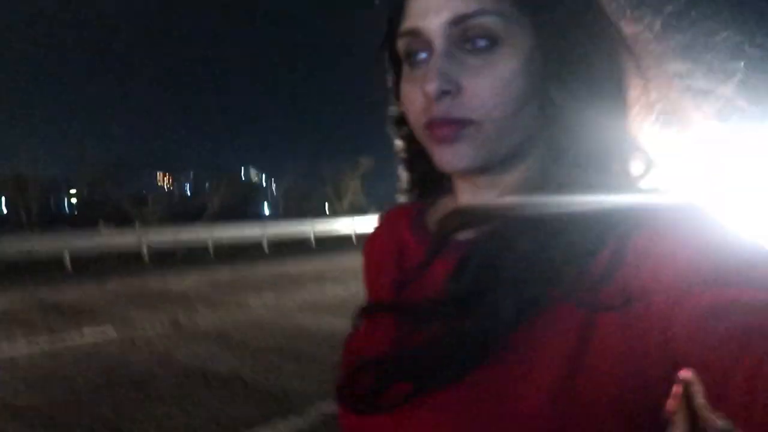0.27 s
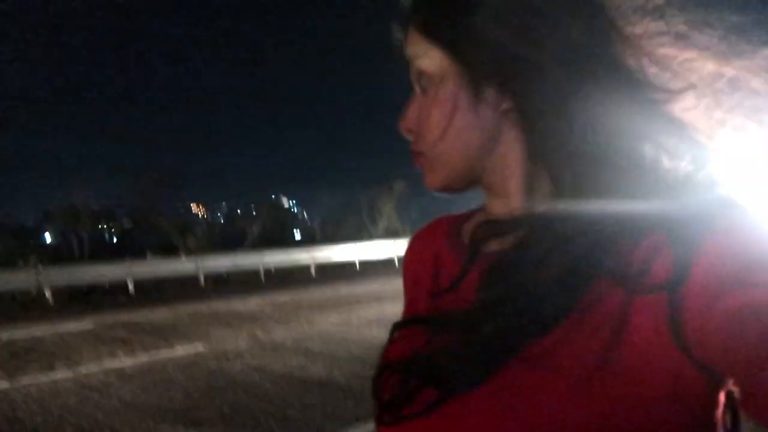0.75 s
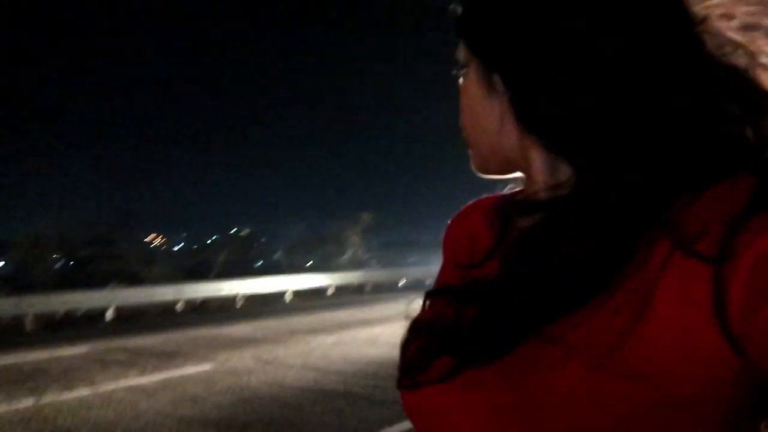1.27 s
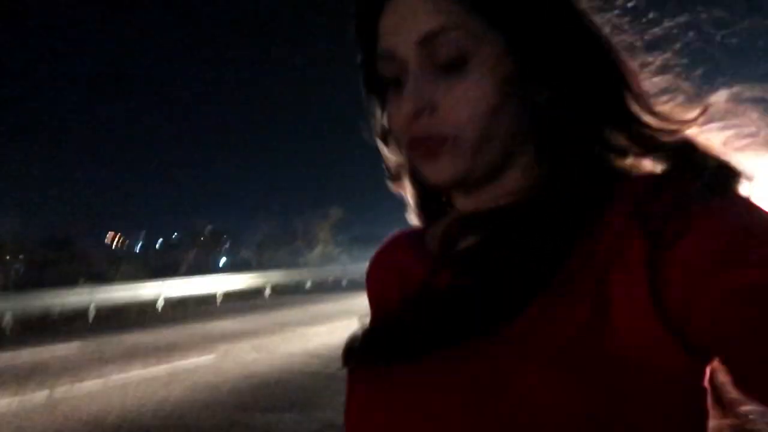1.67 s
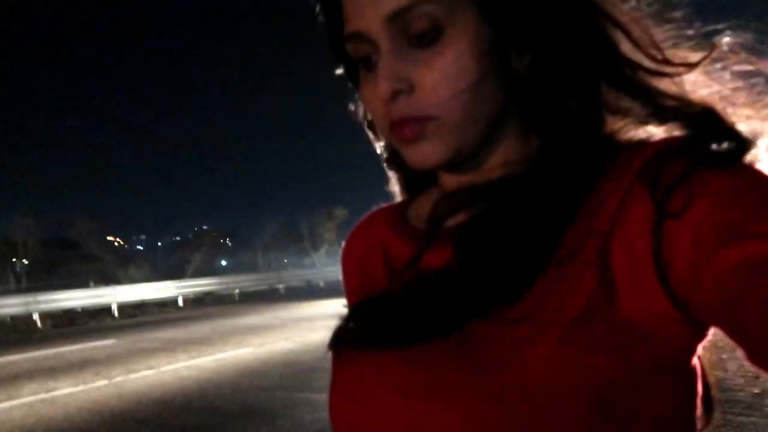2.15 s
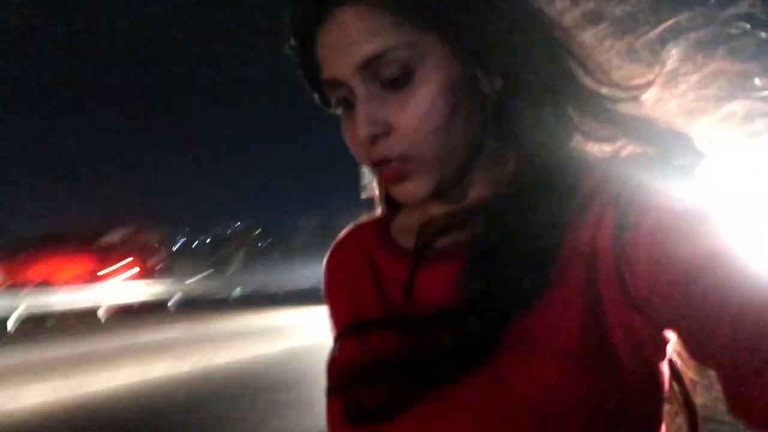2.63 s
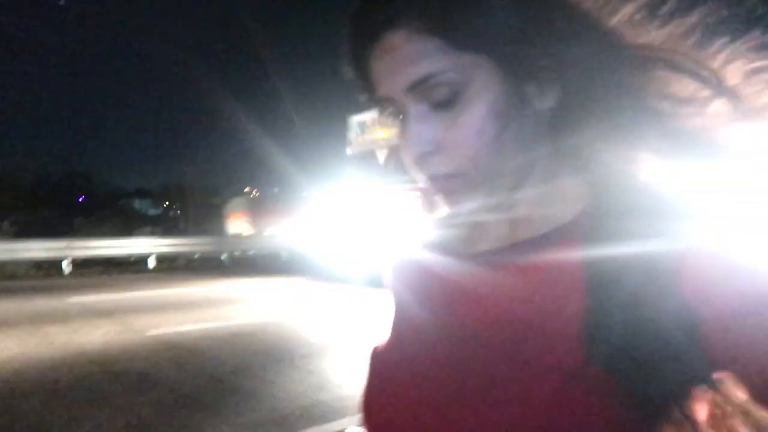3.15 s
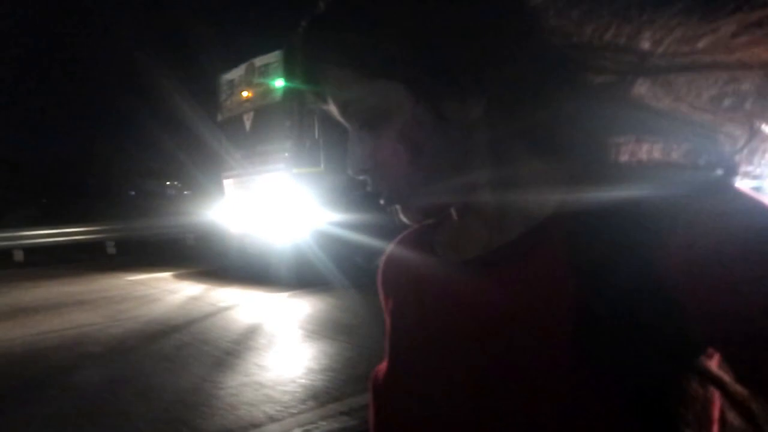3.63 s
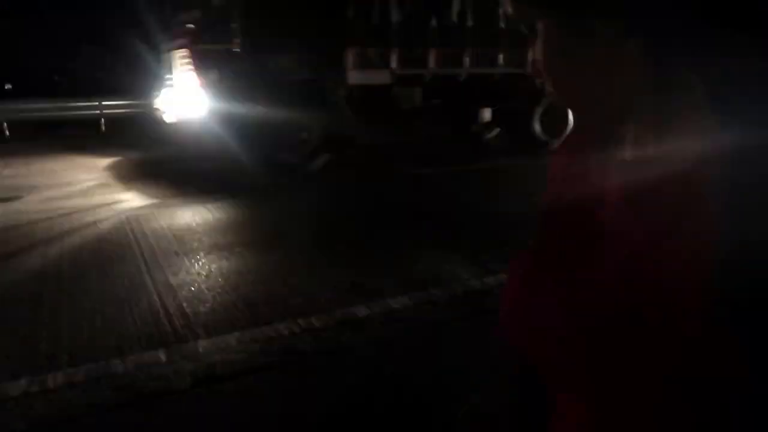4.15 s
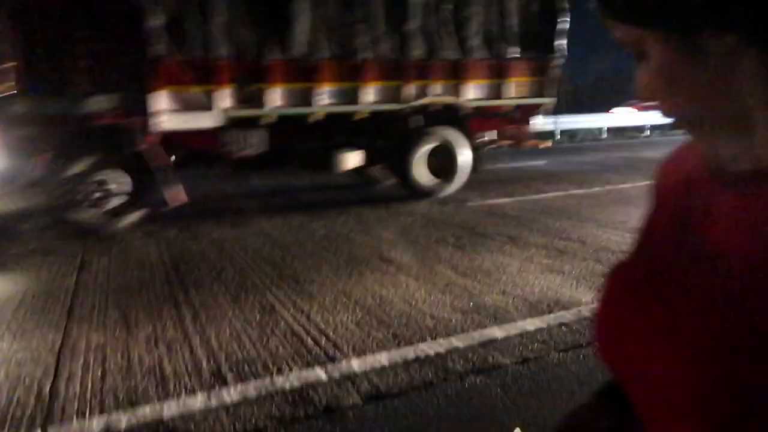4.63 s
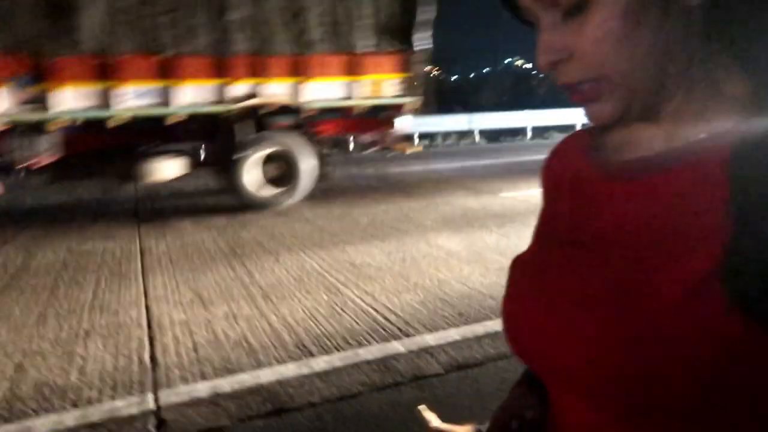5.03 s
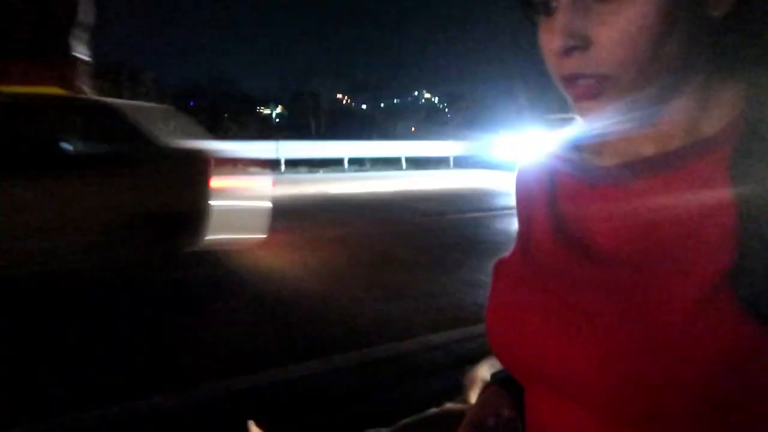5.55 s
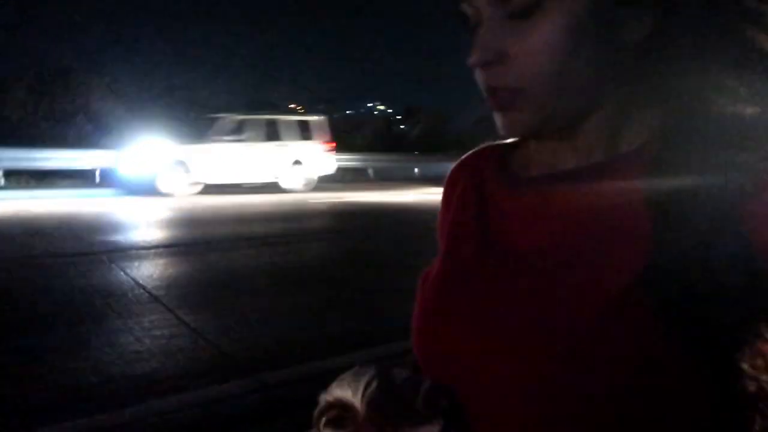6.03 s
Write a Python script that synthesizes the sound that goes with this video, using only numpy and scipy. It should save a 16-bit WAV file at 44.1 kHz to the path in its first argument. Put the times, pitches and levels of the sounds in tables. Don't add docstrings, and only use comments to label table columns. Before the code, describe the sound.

Hard wind buffets a hand-held microphone beside a highway as vehicles rush past, tyres whining on grooved concrete, louder and closer towards the end.

```python
import sys
import numpy as np
from scipy import signal
from scipy.fft import rfft, irfft, next_fast_len
from scipy.io import wavfile
from scipy.ndimage import uniform_filter1d, minimum_filter1d, map_coordinates

SR = 44100
rng = np.random.default_rng(int(sys.argv[2]) if len(sys.argv) > 2 else 0)


def volts_from_db(level):
    exponent = np.asarray(level, float) / 20
    return 10 ** exponent


def wav_out(sig):
    wavfile.write(sys.argv[1], SR, np.round(np.clip(np.atleast_2d(sig).T, -1, 1) * 32767).astype(np.int16))


N = 277168
STEP = 64


def unit(x):
    return x / np.sqrt(np.mean(x ** 2) + 1e-20)


def power_db(power):
    return 10 * np.log10(np.abs(power) + 1e-12)


def curves(rows):
    s, *cols = np.transpose(rows)
    return [np.interp(np.arange(N) / SR, s, c) for c in cols]


def per_sample(x):
    return np.interp(np.arange(N), np.arange(0, N, STEP), x)


def wobble(rate):
    return map_coordinates(rng.standard_normal(int(N * rate / SR) + 4), [np.arange(N) * rate / SR])


def colour(x, points, turn=0):
    m = next_fast_len(N + 8192)
    hz, db = np.transpose(points)
    log_hz = np.log(np.fft.rfftfreq(m, 1 / SR) + 1)
    gain = volts_from_db(np.interp(log_hz, np.log(hz), db, -120, -120))
    return unit(irfft(rfft(x, m) * gain * np.exp(1j * turn), m)[:N])


def patchy(depth_db):
    z = signal.stft(rng.standard_normal(N + 512), nperseg=512)[2]
    field = uniform_filter1d(rng.standard_normal(z.shape), size=4, axis=0)
    field = uniform_filter1d(field, size=10, axis=1)
    return signal.istft(z * volts_from_db(depth_db * unit(field)), nperseg=512)[1][:N]


# time in seconds, strength in dB, deep rumble over it in dB.
BREEZE = [(0, -20.5, -10.5), (.5, -24, -11.5), (.85, -19.5, -14.5), (1.08, -25.5, -13.5), (1.4, -23, -14.5),
          (1.7, -29, -12), (2.1, -23.5, -12), (2.55, -15.5, -15), (2.85, -24, -7.5), (3.2, -17, -23),
          (3.65, -26.5, -27.5), (4.0, -27.5, -21.5), (4.4, -21, -21.5), (4.95, -24, -17),
          (5.45, -25.5, -26), (5.6, -21.5, -31.5), (5.95, -40, -22), (6.28, -31, -26)]
# start in seconds, length in seconds, level in dB, difference between the ports in dB relative
GUSTS = [(0, 0.025, -19.5, -19), (0.115, 0.046, -17.5, -14), (0.524, 0.011, -16, -23),
         (.575, 0.026, -17.5, -14), (0.708, .06, -15.5, -12), (.79, .05, -18, -13),
         (1.198, 0.064, -16.5, -15.5), (1.312, 0.089, -22.5, -20), (1.436, 0.012, -18.5, -16),
         (2.035, 0.066, -21, -20), (2.61, 0.088, -20, -14), (2.794, 0.034, -20, -19),
         (2.905, .05, -17, -22), (2.954, 0.15, -15.5, -13), (3.163, .17, -15, -11), (3.345, .05, -16, -14),
         (3.42, .11, -15.5, -13), (3.554, 0.06, -17.5, -22), (3.685, 0.022, -16.5, -20),
         (3.735, .06, -16.5, -19), (3.85, .03, -21, -22), (4.172, 0.026, -20.5, -22),
         (4.264, 0.058, -15, -18.5), (4.475, 0.085, -21.5, -24), (4.784, 0.056, -19.5, -24.5),
         (4.977, 0.025, -22, -25), (5.13, 0.11, -17, -22.5), (5.22, .07, -15.5, -22),
         (5.31, .07, -17.5, -20), (6.118, 0.11, -19, -20), (6.198, 0.036, -22, -29)]
RISE_S, FALL_S = 0.014, 0.022
LINGER_S = .08
BREEZE_APART_DB = -22


def gusts():
    t = np.arange(N) / SR
    breeze_db, deep_db = curves(BREEZE)
    both, one = volts_from_db(2 * breeze_db), volts_from_db(2 * (breeze_db + BREEZE_APART_DB))
    for s, length, db, under_db in GUSTS:
        corners = [s - RISE_S, s + RISE_S, s + length, s + length + 2 * FALL_S]
        shape = np.interp(t, corners, [0, 1, 1, 0]) ** 2
        both = both + volts_from_db(2 * db) * shape
        one = one + volts_from_db(2 * (db + under_db)) * shape
    size = int(LINGER_S * SR) + 1
    slow_both = power_db(uniform_filter1d(both, size=size))
    slow_one = power_db(uniform_filter1d(one, size=size))
    return power_db(both), slow_both + deep_db, slow_one


def thumps(table, t60):
    out, t = np.zeros(N + SR), np.arange(SR // 10) / SR
    shape = (1 - np.exp(-t / (0.18 * t60))) * volts_from_db(-60 * t / t60)
    for (s, db, hz), phase in zip(table, rng.uniform(0, 2 * np.pi, len(table))):
        push = np.sin(2 * np.pi * hz * t + phase)
        push += 0.21 * np.sin(2 * np.pi * 1.91 * hz * t + 2 * phase)
        out[round(s * SR):][:len(t)] += volts_from_db(db + 6) * shape * push
    return out[:N]


def stirred(lumps, share):
    hits = rng.uniform(size=N) < 350 / SR
    kicks = unit(hits * np.clip(rng.standard_normal(N), -2, 2))
    return lumps * (share * kicks + rng.standard_normal(N))


# time in seconds, peak in dB, pitch in Hz.
THUMPS = [(.528, -16, 306), (.583, 1.5, 351), (.668, -6, 216), (.712, -2, 400), (.797, 1, 277),
          (.835, 0, 250), (1.038, -2.5, 347), (1.193, -14, 333), (1.231, -4, 440), (1.267, -13, 500),
          (1.449, -0.5, 300), (1.577, -6, 358), (2.035, -4, 211), (2.068, 0, 470), (2.165, -6, 432),
          (2.306, -5, 290), (2.496, -3, 357), (2.783, -6, 460), (3.174, 1.5, 353), (3.696, -5, 320),
          (4.27, -4, 524), (4.384, -3, 377), (4.514, -8, 236), (4.689, -4, 263), (4.957, -5, 428),
          (5.151, -2.5, 296), (5.329, -17.5, 326), (5.494, -8, 404), (6.138, -4, 406), (6.202, -1, 291)]
# time in seconds, peak in dB, pitch in Hz.
SNAPS = [(.743, -2, 536), (.8, -6, 587), (.833, -9, 616), (1.213, -9, 592), (1.259, -9, 520),
         (1.449, -8, 680), (2.968, -6.5, 770), (3.053, -6, 501), (3.249, -2, 772), (3.415, -6, 501),
         (4.285, 0.5, 695), (4.499, -2.5, 740)]
# frequency in Hz, level in dB per Hz.
BUFFET = [(50, -47.5), (100, -21), (190, -5), (420, -2.5), (480, -4), (520, -17), (750, -12.5),
          (1100, -28.5), (2000, -41.5)]
# frequency in Hz, level in dB per Hz.
RUMBLE = [(15, -30.5), (30, -24.5), (60, -8.5), (110, 1), (160, 3), (260, -28.5)]
# frequency in Hz, level in dB per Hz.
CRACKLE = [(250, -14.5), (500, 5.5), (800, -3), (1200, -5), (1700, -17), (3000, -42)]
# frequency in Hz, level in dB per Hz.
EDDIES = [(80, -42.5), (200, -17.5), (350, 3.5), (520, 1.5), (750, 1), (1100, 0), (1500, -1.5), (2000, -14),
          (3000, -31)]


def wind(gust_db, deep_db, eddy_db):
    lumps = volts_from_db(.5 * wobble(16) + 1.5 * wobble(70))
    crackle_db = -33.5 + 1.95 * (gust_db + 21.5)
    common = volts_from_db(gust_db - 2.5) * colour(stirred(lumps, .9), BUFFET)
    common += volts_from_db(deep_db + 1.0) * colour(stirred(lumps, .3), RUMBLE)
    common += volts_from_db(crackle_db) * colour(stirred(lumps, .8), CRACKLE)
    common += thumps(THUMPS, t60=.019) + thumps(SNAPS, t60=.013)
    apart = volts_from_db(eddy_db - 1.04) * colour(stirred(lumps, 1.2), EDDIES)
    return np.array([common, apart])


DUCK_FROM_DB, DUCK_RATIO, DUCK_HOLDS_S = -20, 0.41, .12


def ducking(gust_db):
    keep = np.exp(-1 / (DUCK_HOLDS_S * SR))
    load_db = power_db(signal.lfilter([1 - keep], [1, -keep], volts_from_db(2 * gust_db)))
    return volts_from_db(-DUCK_RATIO * np.maximum(load_db - DUCK_FROM_DB, 0))


# time in seconds, pitch in Hz, level in dB.
DRONE = [(0, 198.4, -36), (1.2, 199.5, -46.5), (1.5, 200.1, -33.5), (2.3, 204, -35.5), (2.9, 200.5, -31.5),
         (3.3, 198, -45), (6.28, 184.8, -56.5)]


def engine():
    hz, db = curves(DRONE)
    phase = 2 * np.pi * np.cumsum(hz + 5 * wobble(25)) / SR
    note = volts_from_db(db + 2.5 + 2.4 * wobble(10)) * np.sin(phase)
    return np.array([note, np.zeros(N)])


# time in seconds, level in dB.
SQUEAKS = [(.155, -53), (.405, -52), (.66, -65), (.92, -56), (1.18, -55), (1.44, -54), (1.695, -47),
           (1.95, -45), (2.21, -48), (2.5, -62), (2.765, -51)]
SQUEAK_HZ, SQUEAK_SAG_HZ_PER_S = 11400, 370
SQUEAK_T60_S, SQUEAK_LENGTHENS = .28, .55


def squeaks():
    out, t = np.zeros((2, N + SR)), np.arange(SR // 3) / SR
    flutter_db, shake_hz = 4 * wobble(90), 150 * wobble(300)
    for s, db in SQUEAKS:
        at = round(s * SR)
        hz = SQUEAK_HZ - SQUEAK_SAG_HZ_PER_S * s
        t60 = SQUEAK_T60_S * np.exp(SQUEAK_LENGTHENS * s)
        drop_hz, creep_hz = 900 * np.exp(-t / .012), 650 * (1 - np.exp(-t / .09))
        pitch = hz + drop_hz + creep_hz - 120 + shake_hz[at:at + len(t)]
        shape = (1 - np.exp(-t / .015)) * volts_from_db(-60 * t / t60) * np.clip((.29 - t) / .04, 0, 1)
        tone = volts_from_db(db + 6.5) * shape * np.sin(2 * np.pi * np.cumsum(pitch) / SR)
        alike = volts_from_db(np.clip((10700 - pitch) / 25 - 12, -30, -9.5))
        out[:, at:at + len(t)] += tone * [alike, np.ones(len(t))]
    return out[:, :N] * volts_from_db(flutter_db)


# frequency in Hz, level in dB per Hz.
SING = [(1600, -28), (1820, -2), (1950, 1), (2100, -9.5), (2350, -34.5)]
SING_DB, SING_UNTIL_S, SING_FADE_S, SING_APART_DB = -30.5, 0.5, .12, -6


def tread_song():
    level_db = SING_DB - 20 * np.maximum(np.arange(N) / SR - SING_UNTIL_S, 0) / SING_FADE_S
    common = colour(patchy(depth_db=2), SING)
    apart = volts_from_db(SING_APART_DB) * colour(rng.standard_normal(N), SING)
    return volts_from_db(level_db) * np.array([common, apart])


# time in seconds, level in dB, length in seconds.
PUFFS = [
    (1.294, -52, .02),
    (3.875, -45, 0.041),
    (6.015, -36, 0.0054),
    (6.174, -43.5, 0.041),
]
# frequency in Hz, level in dB per Hz.
GRIT = [(3000, -37), (4500, -3), (7000, -4), (9000, -29), (12000, -39)]


def grit():
    t = np.arange(N) / SR
    puffs = sum(volts_from_db(db) * np.exp(-((t - s) / length) ** 2 * 4) for s, db, length in PUFFS)
    return puffs * colour(rng.standard_normal(N), GRIT)


# closest moment in seconds, tyre level in dB, nearing time in seconds,
# leaving time in seconds, tread (a number: minus for heavy roar, plus for whine).
FAR_LANE = [
    (0.14, -30, 0.24, 0.56, -0.019),
    (0.57, -28.5, 0.51, 0.058, 0.2),
    (.72, -37, .06, 0.058, .2),
    (1.22, -38, 0.076, 0.13, 0),
    (1.5, -31.5, 0.15, .3, .1),
    (1.95, -27, 0.25, 0.19, -.2),
    (2.42, -26, 0.28, 0.42, -0.43),
    (2.9, -22.5, 0.36, .06, 0.19),
    (3.12, -30, 0.12, .15, .6),
    (6.17, -21, .15, .15, 0.46),
]
# closest moment in seconds, tyre level in dB, nearing time in seconds,
# leaving time in seconds, tread (a number as above).
NEAR_LANE = [
    (4.58, -22, .12, 0.22, 1),
    (4.85, -23, 0.14, 0.093, 0.14),
    (5.14, -20.5, 0.26, 0.19, 0.42),
    (5.48, -20, .06, 0.18, .2),
    (5.83, -28, 0.16, 0.35, -0.9),
]
# closest moment in seconds, level in dB, nearing time in
# seconds, leaving time in seconds, tread (a number as above).
TRUCK_CAB = [
    (3.7, -35.5, .25, 0.33, 0.036),
    (4.2, -22.5, 0.17, .12, .6),
    (4.42, -27, .1, .15, 1),
]
CAB_HISSES = 1.19
FAR_DB, FALL_OFF = -44, 1.383


def passing(offset_db, tilt_db, near_db=0):
    t, power = np.arange(0, N, STEP) / SR, volts_from_db(2 * FAR_DB)
    for lane, lane_db in (FAR_LANE, 0), (NEAR_LANE, near_db), (TRUCK_CAB, CAB_HISSES * near_db):
        for s, db, nearing, leaving, tread in lane:
            distance = 1 + ((t - s) / np.where(t < s, nearing, leaving)) ** 2
            power = power + volts_from_db(2 * (db + lane_db + tilt_db * tread)) / distance ** FALL_OFF
    return per_sample(power_db(power) + offset_db)


# frequency in Hz, level in dB per Hz.
ROAR = [(40, -27.5), (150, -11), (300, -0.5), (600, -0.5), (1000, 2.5), (1400, 0.5), (1800, -9.5),
        (2600, -45.5)]
# frequency in Hz, level in dB per Hz.
WHINE = [(900, -31.5), (1400, -8), (1900, 2), (2500, -2.5), (3100, -9), (3700, -27.5), (5000, -63)]
# frequency in Hz, level in dB per Hz.
HISS = [(2400, -5), (3300, 5), (3900, 2), (5000, -6), (6000, -13.5), (7000, -17.5), (8000, -33),
        (10000, -74)]
# frequency in Hz, level in dB per Hz.
FINE = [(6000, -30.5), (7500, 1), (8600, -1), (10000, -8.5), (10800, -13.5), (12000, -50)]
# frequency in Hz, level in dB per Hz.
AIRY = [(10500, -41), (11500, -9.5), (12500, -6.5), (14000, -8), (15200, -10.5), (16000, -51.5)]
FINE_DB, FINE_GROWS = -69, 1.265
AIRY_DB, AIRY_GROWS = -66.5, .9
AIRY_LOSS, FACING_DB = 4.5, -7


def tyres(road, roar_db, whine_db, hiss_db, off_db):
    swell = 0.17 * wobble(7.8)
    over_db = hiss_db + 40
    fine_db = FINE_DB + FINE_GROWS * over_db
    airy_db = AIRY_DB + AIRY_GROWS * over_db - AIRY_LOSS * np.maximum(off_db - FACING_DB, 0)
    common = volts_from_db(roar_db + swell) * colour(road, ROAR)
    common += volts_from_db(whine_db + swell) * colour(road, WHINE)
    common += volts_from_db(hiss_db + swell) * colour(road, HISS)
    return common + volts_from_db(fine_db) * colour(road, FINE) + volts_from_db(airy_db) * colour(road, AIRY)


# frequency in Hz, level in dB per Hz.
WHINE_ACROSS = [(900, -30), (1500, -6), (2000, 0), (2500, -4), (2900, -11), (3500, -40)]
# frequency in Hz, level in dB per Hz.
HISS_ACROSS = [(2100, -30), (2800, -5), (3300, 0), (4000, 0), (5000, -3), (6000, -8), (6800, -15),
               (8000, -45)]
# frequency in Hz, level in dB per Hz.
FINE_ACROSS = [(5500, -30), (6600, -6), (7200, -1), (8000, 0), (9000, -4), (10000, -6), (11000, -9),
               (12000, -35)]
# frequency in Hz, level in dB per Hz.
TOP_ACROSS = [(10000, -30), (11000, -4), (11700, 1), (13000, -6), (14000, -14), (14500, -15), (15000, -13),
              (15600, -60)]
HISS_APART_DB, FINE_APART_DB, TOP_APART_DB = -4.2, -15.5, -26
WHINE_APART_DB, WHINE_TURNS, WHINE_LEAST_DB = -17, 2, -25
BEHIND_DB = 5


def between_ports(road, whine_db, hiss_db, share, off_db):
    other = unit(patchy(depth_db=3.0))
    tied = np.clip(share, -.95, .95)
    late = colour(road, [(20, 0), (22000, 0)], turn=-.8)
    both = tied * late + np.sqrt(1 - tied ** 2) * other
    behind_db = BEHIND_DB * abs(tied)
    layers = volts_from_db(HISS_APART_DB) * colour(both, HISS_ACROSS)
    layers = layers + volts_from_db(FINE_APART_DB + behind_db) * colour(both, FINE_ACROSS)
    layers = layers + volts_from_db(TOP_APART_DB + behind_db) * colour(both, TOP_ACROSS)
    shaded = colour(other - .6 * late, WHINE_ACROSS)
    shaded_db = np.maximum(WHINE_APART_DB + WHINE_TURNS * off_db, WHINE_LEAST_DB)
    return volts_from_db(hiss_db + off_db) * layers + volts_from_db(whine_db + shaded_db) * shaded


# time in seconds, share of the difference tied to the
# common sound (a number from -1 to 1), off-axis difference in dB.
BEARING = [(0, -0.028, 4), (.75, 0, 3.5), (1.3, -0.11, 3.5), (1.8, 0.31, 2), (2.3, .15, 1),
           (3.35, -0.063, 2.5), (3.62, 0.16, -6), (4.25, 0.17, -5), (4.55, -.2, -6), (4.72, -0.2, -4),
           (5.2, -.6, -1.5), (5.7, -0.72, 0.5), (6.28, -.7, 1.5)]
ROAR_DB, ROAR_TILT_DB = 3.5, -7
WHINE_DB, WHINE_TILT_DB = -1.5, 2
HISS_DB, HISS_TILT_DB, NEAR_HISS_DB = -15.5, 0.3, 6


def traffic():
    roar_db, whine_db = passing(ROAR_DB, ROAR_TILT_DB), passing(WHINE_DB, WHINE_TILT_DB)
    hiss_db = passing(HISS_DB, HISS_TILT_DB, NEAR_HISS_DB)
    share, off_db = curves(BEARING)
    road = patchy(depth_db=1.5)
    common = tyres(road, roar_db, whine_db, hiss_db, off_db) + grit()
    return np.array([common, between_ports(road, whine_db, hiss_db, share, off_db)])


def scene():
    gust_db, deep_db, eddy_db = gusts()
    rest = wind(gust_db, deep_db, eddy_db) + engine() + squeaks()
    common, apart = (traffic() + tread_song()) * ducking(gust_db) + rest
    return np.array([common + apart, common - apart])


def limited(x, top):
    need = np.minimum(1, top / (np.abs(x).max(axis=0) + 1e-9))
    return x * uniform_filter1d(minimum_filter1d(need, size=441), size=221)


def masked(pair):
    hz, _, z = signal.stft(pair, SR, nperseg=2048, noverlap=1536)
    band = np.arange(len(hz)) // 16
    power = np.add.reduceat(np.abs(z) ** 2, np.arange(0, len(hz), 16), axis=1)
    power = uniform_filter1d(power, size=3, axis=2)
    common_db, apart_db = 10 * np.log10(np.abs(power) + 1e-20)[:, band]
    high = hz[:, None] > 6500
    keep_common = ~high | ((common_db > apart_db - 9) & (common_db > -86))
    shrill_db = np.maximum.accumulate(np.where(hz[:, None] > 10000, apart_db, -200), axis=0)
    keep_apart = (apart_db > common_db - 25.5) & ~(high & (apart_db < shrill_db - 19))
    return signal.istft(z * [keep_common, keep_apart], SR, nperseg=2048, noverlap=1536)[1][:, :N]


def band_limit(x):
    return signal.sosfilt(signal.butter(12, 15300, fs=SR, output="sos"), x)


def record(dry):
    left, right = limited(dry, top=.84)
    common, apart = masked(np.array([left + right, left - right]) / 2)
    return band_limit(np.array([common + apart, common - apart]))


dry = scene()
out = record(dry)
wav_out(out)
```